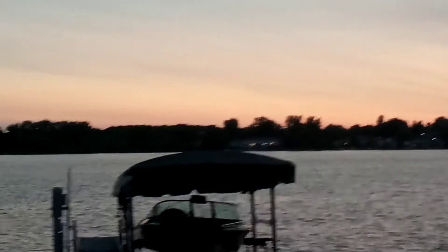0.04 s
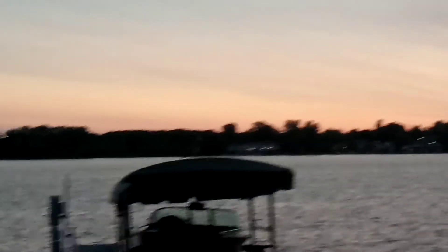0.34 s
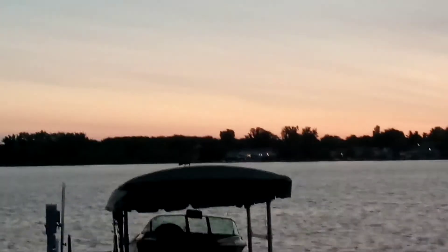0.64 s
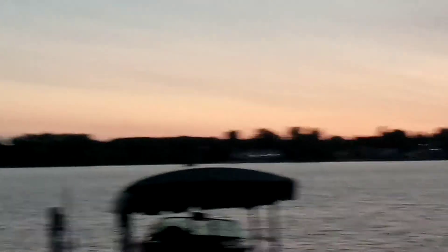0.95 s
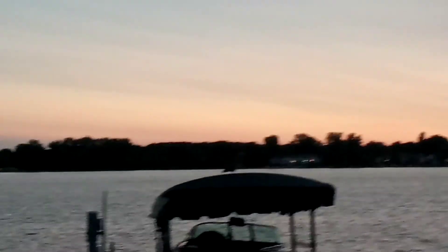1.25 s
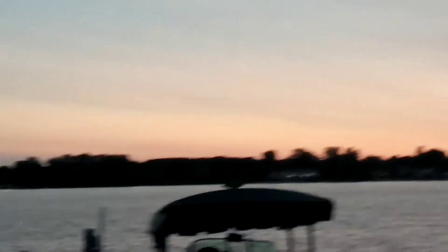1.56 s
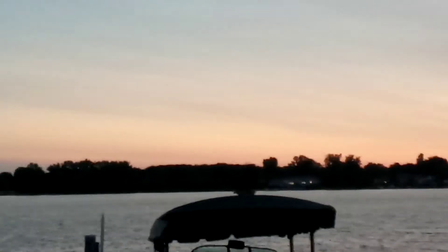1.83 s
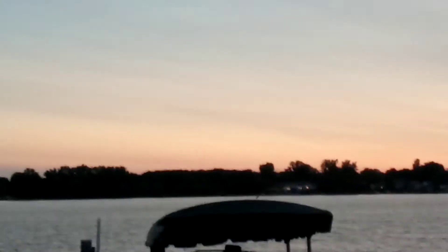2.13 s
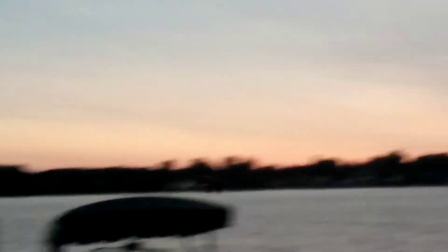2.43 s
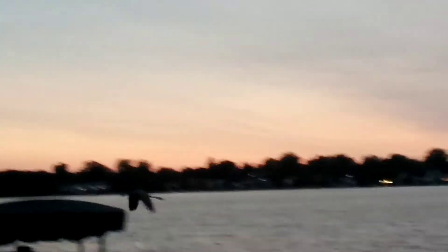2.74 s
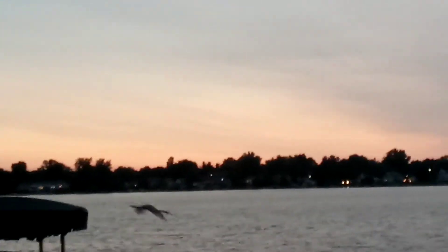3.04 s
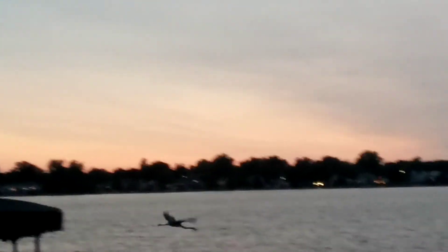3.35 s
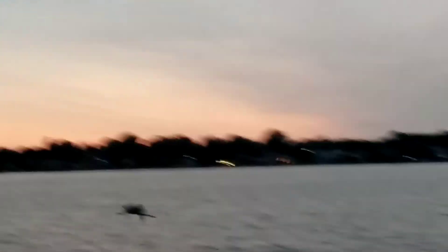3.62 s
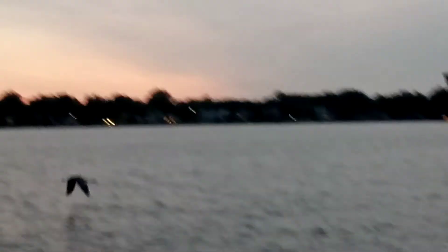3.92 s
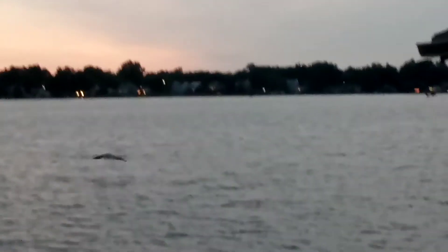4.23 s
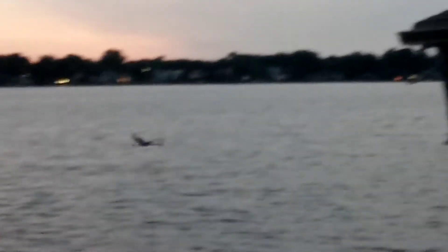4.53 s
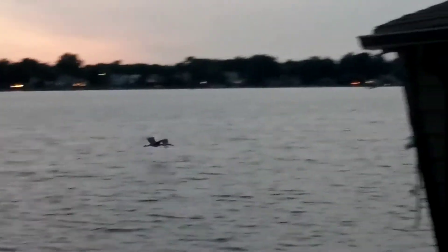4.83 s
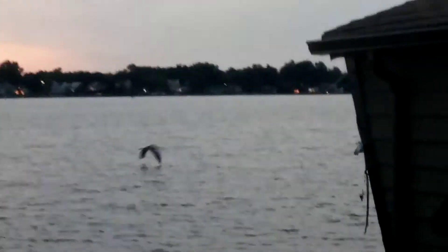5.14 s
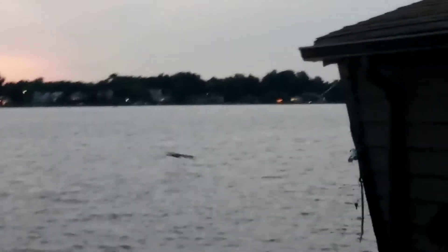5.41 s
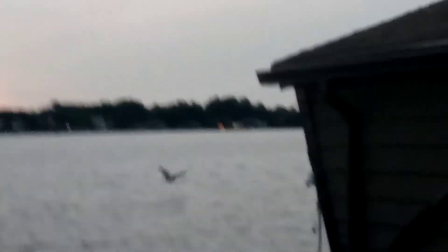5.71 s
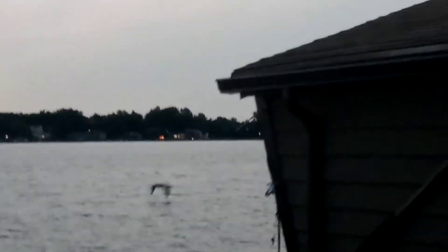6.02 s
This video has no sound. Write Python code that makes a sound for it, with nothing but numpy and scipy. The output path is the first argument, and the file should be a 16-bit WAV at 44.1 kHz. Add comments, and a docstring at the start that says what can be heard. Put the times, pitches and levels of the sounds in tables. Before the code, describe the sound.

Insects trill beside gently lapping water while wood snaps close by and a large bird squawks hoarsely three times, then croaks.

```python
"""A lake at dusk. A heron leaves a boat-lift canopy and flies out: three harsh squawks, then a low
rattling croak, all from slapping membranes that ring its throat. Three katydids and a tree cricket
sing with wing strokes over a distant insect chorus; another insect ticks. Close by, wood snaps,
with rustles, two soft bumps and faint chirps. Water laps and plops; far motors drone over a rumble."""
import sys
import numpy as np
from scipy import signal
from scipy.fft import rfft, irfft, next_fast_len
from scipy.io import wavfile
from scipy.ndimage import uniform_filter1d, map_coordinates

SR = 44100
rng = np.random.default_rng(int(sys.argv[2]) if len(sys.argv) > 2 else 0)


def transcribe(u):
    """Save the signal u as a 16-bit wav file named by the first command-line argument.

    u: samples, shape (n,) or (channels, n), limited to [-1, 1]; the rate is SR.
    q: integer samples, one column per channel.
    """
    v = np.clip(np.atleast_2d(u).T, -1, 1)
    q = np.round(v * 32767).astype(np.int16)
    wavfile.write(sys.argv[1], SR, q)


N = 272097

# squawks: (start [s], attack [s], hold [s], level at end of hold [dB], swell over hold [dB],
# fade-in [s], release [dB/s], slap rate [1/s], lower resonance [Hz], upper resonance [Hz],
# its sink [Hz/s], upper-band share before limiting [dB], nasal valley depth [0-1])
SQUAWKS = [ (2.25, 0.205, 0.19, -32.5, -2.5, 0.052, 153, 179, 640, 2740, 900, 2.5, 0.25),
           (2.799, 0.065, 0.18, -33, 5, 0.028, 197, 135, 1000, 2880, 2600, -2, 0.26),
           (3.244, .087, .11, -31.5, 3.5, 0.018, 176.5, 154, 985, 2810, 1200, -1.5, 0.8), ]
# break-up per squawk: (noise share at start of hold [0-1], at end of hold [0-1])
SQUAWK_NOISE = [(.72, .85), (.7, .8), (.42, .85)]
# throat response, one per squawk: (frequency [Hz], gain [dB])
FIRST_THROAT = [(450, -12.5), (680, -2), (880, -4.5), (1050, 2), (1400, 1), (1800, -6), (2100, -1.5),
                (2400, -2.5), (3050, -8.5), (3900, -16), (4500, -23.5), (5400, -30.5), (7000, -29.5),
                (9000, -49)]
SECOND_THROAT = [(450, -7), (700, -9.5), (1030, 1.5), (1500, -7), (1750, -3), (1950, -6.5), (2280, -0.5),
                 (2550, -5), (2820, -0.5), (3120, -17), (3450, -12), (4200, -23.5), (8000, -40)]
THIRD_THROAT = [(450, -11.5), (700, -14), (1030, -3), (1300, -1.5), (1600, -5), (1850, -7), (2200, -4),
                (2650, -0.5), (3020, -12), (3230, -9), (3700, -23), (4100, -23.5), (7000, -33.5),
                (9000, -45)]
ONSET_DB = -46.5  # call level at zero effort


def heron():
    """Three squawks and a croak, each with its own throat shape."""
    out = np.zeros(N)
    throats = [FIRST_THROAT, SECOND_THROAT, THIRD_THROAT]
    calls = [(start_s, squawk(call, throat, noise_shares))
             for (start_s, *call), throat, noise_shares in zip(SQUAWKS, throats, SQUAWK_NOISE)]
    for start_s, voice in calls + [(CROAK_CONTOUR[0][0], croak())]:
        out[round(start_s * SR):][:len(voice)] += voice
    return out


def squawk(call, throat, noise_shares, span_s=0.8, width_hz=190, valley_hz=1850, split_hz=1900):
    """One push of effort sets level, slap rate and roughness; the throat's upper resonance sinks."""
    (attack_s, hold_s, end_db, swell_db, fade_s, release_db_per_s,
     rate_hz, low_hz, high_hz, sink_hz_per_s, upper_db, valley_depth) = call
    t = clock()[:round(span_s * SR)]
    end_s, full_db = attack_s + hold_s, end_db - swell_db
    level_db = np.interp(t, [0, attack_s, end_s], [ONSET_DB, full_db, end_db])
    level_db -= release_db_per_s * np.maximum(t - end_s, 0)
    effort = np.clip((level_db - ONSET_DB) / (full_db - ONSET_DB), 0, 1)
    by_effort = lambda slack, full: slack + (full - slack) * effort
    over_hold = lambda first, last: np.interp(t, [attack_s, end_s], [first, last])
    noise_share = by_effort(0.87, over_hold(*noise_shares))
    source = syrinx(by_effort(0.86 * rate_hz, rate_hz), noise_share, flutter_share=0.5)
    # the nasal valley fills as the bill opens
    source -= over_hold(valley_depth, 0) * resonate(source, np.full(len(t), valley_hz), width_hz=270)
    low = resonate(source, np.full(len(t), low_hz), width_hz)
    high = resonate(source, high_hz - sink_hz_per_s * np.minimum(t, end_s + 0.023), width_hz)
    voice = coloured(source + by_effort(0.86, 0.59) * low + by_effort(0.86, 0.85) * high, throat)
    lower_band = signal.sosfiltfilt(signal.butter(4, split_hz, fs=SR, output="sos"), voice)
    upper_share = np.clip(amp(by_effort(-3, upper_db)) ** 2, 0.03, 0.85)
    voice = blend(unit(lower_band), unit(voice - lower_band), upper_share)
    return np.minimum(t / fade_s, 1) * amp(level_db) * steady(voice)


# croak contour: (time [s], level [dB], resonance [Hz])
CROAK_CONTOUR = [(4.245, -50.5, 950), (4.268, -41, 1030), (4.3, -36, 1470), (4.335, -34.5, 1270),
                 (4.372, -34, 1160), (4.392, -38, 980), (4.415, -46.5, 830)]
# rattle: (time [s], slap rate [1/s])
CROAK_RATTLE = [(4.245, 77), (4.265, 79), (4.3, 90), (4.325, 96), (4.37, 94), (4.39, 75), (4.415, 68)]
# throat response: (frequency [Hz], gain [dB])
CROAK_THROAT = [(450, -24), (700, -5), (860, -13.5), (1040, -4.5), (1340, -8), (1570, -3.5), (1850, -12.5),
                (2200, -7), (2700, -10.5), (3350, -31), (3880, -17), (4400, -21.5), (6500, -28.5)]


def croak(span_s=0.8, release_db_per_s=131, clean_db=-39, width_hz=600, ring_gain=1.8, echo_db=-16):
    """Slow slaps, cleanest when loud, ring a rising then falling resonance; distance adds echo."""
    t = CROAK_CONTOUR[0][0] + clock()[:round(span_s * SR)]
    level_db, ring_hz = curves(CROAK_CONTOUR, t)
    rate_hz, = curves(CROAK_RATTLE, t)
    level_db -= release_db_per_s * np.maximum(t - CROAK_CONTOUR[-1][0], 0)
    noise_share = np.interp(level_db, [ONSET_DB, clean_db], [0.6, 0.22])
    source = syrinx(rate_hz, noise_share, flutter_share=0.3)
    ringing = resonate(resonate(source, ring_hz, width_hz), ring_hz, width_hz)
    voice = amp(level_db) * steady(coloured(source + ring_gain * ringing, CROAK_THROAT))
    return voice + amp(echo_db) * shore(voice)[:len(t)]


def syrinx(rate_hz, noise_share, flutter_share, flutter_s=0.002, puff_s=0.008):
    """Membranes slap unevenly; each slap flutters briefly and lets through a puff of turbulence."""
    n = len(rate_hz)
    onsets = np.flatnonzero(np.diff(np.floor(np.cumsum(rate_hz) / SR)))
    late, strength = rng.standard_normal((n, 2))[:len(onsets)].T
    jitter_periods = 0.2 * late * noise_share[onsets] ** 1.415
    onsets = np.clip(onsets + jitter_periods * SR / rate_hz[onsets], 0, n - 1).astype(int)
    slaps = np.bincount(onsets, amp(0.5 * np.sqrt(noise_share[onsets]) * strength), n)

    def noise_tails(decay_s):
        envelope = signal.fftconvolve(slaps, np.exp(-clock()[:SR // 20] / decay_s))[:n]
        return steady(envelope * rng.standard_normal(n))

    voiced = blend(steady(slaps), noise_tails(flutter_s), flutter_share)
    return blend(voiced, noise_tails(puff_s), noise_share)


# dry snaps: (time [s], crack level [dB], body offset [dB], rebound gain [dB], ring centre [Hz])
WOOD_SNAPS = [(0.503, -20.5, 0, -13, 2870), (0.893, -26, -19, -19, 4600), (1.7257, -18, 1.5, -9, 2300),
              (1.7714, -31.5, 9, -17, 2000), (3.6229, -21, 4.5, -15, 2900), (4.931, -29.5, 10.5, -17, 2300),
              (4.9575, -17, 7, -8.5, 1440), (5.0045, -34, 11.5, -9, 1700), (5.798, -25.5, -4, -3, 1900)]
# wood modes: (frequency [Hz], gain [dB], t60 [s])
WOOD_MODES = [(1158, -2.5, 0.06), (1413, -2.5, 0.037), (1654, -2, 0.041), (1930, 0.5, 0.023),
              (2330, 2.5, 0.037), (2750, -5, 0.048), (3500, 3, 0.014), (4850, 9, 0.012)]
# crack spectrum: (frequency [Hz], gain [dB])
CRACK_SPECTRUM = [(1500, -6.5), (3300, -1), (5200, -7), (6700, -1.5), (8500, -10.5), (15000, -24)]


def snaps(rebound_s=0.0055, rebound_body_db=3, off_centre_db_per_oct=9, attack_s=0.0013, trim_db=-21.5):
    """Each snap and its rebound is a sharp crack that rings the wood's modes at new strengths."""
    rings, t = np.zeros(N + SR), clock()[:SR // 10]
    hz, mode_db, t60_s = np.transpose(WOOD_MODES)[:, :, None]
    contacts = []
    for s, db, body_db, rebound_db, centre_hz in WOOD_SNAPS:
        contacts.append((s, db, body_db, centre_hz))
        contacts.append((s + rebound_s, db + rebound_db, body_db + rebound_body_db, centre_hz))
    attack = 1 - np.exp(-t / attack_s)
    for s, db, body_db, centre_hz in contacts:
        strength, detune = rng.standard_normal((2, len(WOOD_MODES), 1))
        struck_db = mode_db - off_centre_db_per_oct * np.abs(np.log2(hz / centre_hz)) + 2 * strength
        modes = amp(struck_db - 60 * t / t60_s) * np.sin(2 * np.pi * hz * (1 + 0.025 * detune) * t)
        rings[round(s * SR):][:len(t)] += amp(db + body_db + trim_db) * modes.sum(axis=0) * attack
    cracks = bursts([(s, db) for s, db, *_ in contacts], t60_s=0.0074)
    return rings[:N] + coloured(cracks, CRACK_SPECTRUM)


# clearest rustles: (time [s], level [dB], half-width [s], centre [Hz])
NEAR_RUSTLES = [(0.12, -60, 0.19, 970), (0.57, -57.5, 0.11, 740), (0.574, -57, .006, 7150),
                (1.203, -54, 0.0033, 6400), (1.235, -60, .02, 6500), (1.345, -52, 0.038, 2870),
                (1.578, -45.5, 0.0021, 3600), (1.764, -39.5, 0.005, 2480), (1.932, -56, 0.021, 6700),
                (1.98, -57, 0.064, 700), (3.053, -49.5, 0.013, 7360), (3.666, -48.5, 0.015, 2410),
                (3.922, -57, 0.022, 7450), (4.199, -40.5, 0.0025, 3480), (4.22, -47, 0.008, 2800),
                (4.262, -47.5, 0.005, 7400), (4.265, -39, 0.0041, 2400), (4.94, -57, 0.05, 4900),
                (5.35, -55, 0.098, 636), (5.4, -51, 0.014, 3250), (5.604, -53, 0.0095, 7370),
                (6.098, -54.5, 0.013, 6770)]


def rustles(trail_delay_s=0.03, trail_db=-43, trail_hz=1220, crisp_per_s=13, crisp_db=-58.5, crisp_hz=7300):
    """Broad rustles, some alone and one trailing each snap; faint crisp ones come at random."""
    trails = [(s + trail_delay_s, db + body_db + trail_db, 0.038, trail_hz)
              for s, db, body_db, *_ in WOOD_SNAPS]
    crisp = [(when * N / SR, crisp_db + extra_db, 0.0051, crisp_hz * 2 ** (pitch - 0.5))
             for when, extra_db, pitch in rng.random((round(crisp_per_s * N / SR), 3))]
    return flurries(NEAR_RUSTLES + trails + crisp, q=2.1)


# soft bumps: (time [s], level [dB], pitch [Hz])
SOFT_BUMPS = [(2.304, -30, 130), (3.056, -31, 210)]


def bumps(half_width_s=0.0062):
    """Dull knocks, a few cycles long."""
    t = clock()
    return sum(amp(db) * np.exp(-((t - s) / half_width_s) ** 2) * np.sin(2 * np.pi * hz * (t - s))
               for s, db, hz in SOFT_BUMPS)


# song level of each singer: (time [s], level [dB])
NEAR_KATYDID_LEVEL = [(0, -51.5), (1, -53), (2.3, -56), (3.2, -63), (6.1, -65)]
FAR_KATYDID_LEVEL = [(2, -85), (3.2, -61.5), (6.1, -66)]
CRICKET_LEVEL = [(0, -63), (.7, -58), (2.2, -57), (2.9, -71), (3.9, -65.5), (4.6, -62), (6.1, -59.5)]


def singing_insects(quick_db=-11.5, echo_db=-10):
    """Three katydids and a cricket, blurred by trees, come and go as the listener follows the bird."""
    gain = lambda levels: amp(curves(levels, clock())[0])
    near = katydid(rate_hz=59, start_hz=5088, end_hz=4282, overtone_db=-33, scatter_db=0.9)
    far = katydid(rate_hz=59, start_hz=5470, end_hz=4610, overtone_db=-11, scatter_db=3.5)
    quick = katydid(rate_hz=66.8, start_hz=4930, end_hz=4385, overtone_db=-24, scatter_db=1)
    song = gain(NEAR_KATYDID_LEVEL) * (near + amp(quick_db) * quick)
    song += gain(FAR_KATYDID_LEVEL) * far + gain(CRICKET_LEVEL) * tree_cricket()
    return song + amp(echo_db) * shore(song)


def katydid(rate_hz, start_hz, end_hz, overtone_db, scatter_db, duty=0.68, rasp_rad=0.27):
    """Each wing stroke slows along the file, so its tone falls; a weak stroke follows every 6 to 11."""
    strokes = np.cumsum(rate_hz * (1 + 0.01 * wobble(4.4))) / SR
    index = strokes.astype(int)
    strength = amp(scatter_db * rng.standard_normal(index[-1] + 1))
    weak = np.cumsum(rng.integers(7, 13, len(strength)))
    strength[weak[weak < len(strength)]] = 0.54
    travel = np.clip(strokes % 1 / duty, 0, 1)
    hz = start_hz + (end_hz - start_hz) * travel + 60 * wobble(60)
    phase = phase_of(hz) + rasp_rad * wobble(1200)
    tone = np.sin(phase) + amp(overtone_db) * np.sin(2 * phase)
    return unit(strength[index] * np.sin(np.pi * travel) * tone)


def tree_cricket(rate_hz=48.5, pitch_hz=2345, droop_hz=170):
    """A trill of soft, nearly pure pulses, each sagging in pitch."""
    stroke = np.cumsum(rate_hz * (1 + 0.031 * wobble(8.5))) / SR % 1
    phase = phase_of(pitch_hz + droop_hz * (0.5 - stroke) + 75 * wobble(200))
    return unit(np.sin(np.pi * stroke) * amp(1.3 * wobble(20)) * np.sin(phase))


# tick runs: (start [s], count, first gap [s], first level [dB])
INSECT_TICKS = [(2.008, 2, 0.279, -41), (2.8187, 2, 0.32, -48), (3.281, 3, .229, -39),
                (4.488, 10, 0.19, -40)]


def ticking_insect(hurry_s=0.0037, growth_db=0.26):
    """Runs of thin high ticks, each sooner and louder than the last."""
    ticks = [(s + k * gap_s - hurry_s * k * (k - 1) / 2, db + k * growth_db)
             for s, count, gap_s, db in INSECT_TICKS for k in range(count)]
    return coloured(bursts(ticks, t60_s=0.012), [(7000, -12), (8600, 3), (11000, 2), (12500, -17)])


# chirps: (time [s], level [dB])
FAINT_CHIRPS = [(1.085, -46.5), (1.235, -56), (1.309, -47.5), (1.62, -53), (2.01, -52.5)]


def chirps(half_width_s=0.0097, pitch_hz=3200):
    """Faint chirps of narrow-band noise, all on one pitch."""
    return flurries([(s, db, half_width_s, pitch_hz) for s, db in FAINT_CHIRPS], q=7.3)


# clearest plops: (time [s], level [dB], pitch [Hz])
WATER_PLOPS = [(1.742, -53, 900), (1.775, -56, 1090), (3.91, -59.5, 1165), (4.601, -48.5, 1090),
               (4.905, -53, 850), (5.402, -53, 1370), (5.413, -48.5, 612), (5.817, -52, 1840)]


def plops(half_width_s=0.022, faint_per_s=20, faint_db=-8.5, faint_hz=560):
    """Small waves plop ashore; faint ones follow the lapping level, within an octave of their pitch."""
    level_db = lapping_db() + faint_db
    faint = [(when * N / SR, level_db[int(when * N)], faint_hz * 2 ** (2 * pitch - 1))
             for when, pitch in rng.random((round(faint_per_s * N / SR), 2))]
    return flurries([(s, db, half_width_s, hz) for s, db, hz in WATER_PLOPS + faint], q=10.7)


# small waves: (frequency [Hz], gain [dB])
LAPPING_SPECTRUM = [(220, -3), (350, -1), (550, -1), (800, -9), (1100, -15), (1800, -19.5)]


def lapping():
    """Water laps along the shore in shifting patches."""
    return amp(lapping_db()) * rush(LAPPING_SPECTRUM, patchy_db=5)


def lapping_db():
    """One slow swell of the waves."""
    return swell(floor_db=-60, peak_s=3.5, peak_db=-53.5, rise_db_per_s=1.1, fall_db_per_s=2.5)


# far motors: (first pitch [Hz], settled pitch [Hz], settling time [s], floor [dB], peak time [s],
# peak level [dB], rise [dB/s], fall [dB/s])
FAR_MOTORS = [(129.5, 141.5, 3.0, -66, 1.65, -50.5, 5.5, 6), (180, 174.4, 2.8, -62, 4.97, -49.5, 6, 59)]


def motors(hum_hz=254.2, hum_db=-63):
    """Far motors settle to a steady speed and swell once, over a faint hum."""
    out = drone(hum_hz, hum_db)
    for first_hz, settled_hz, settle_s, *swell_shape in FAR_MOTORS:
        out += drone(np.interp(clock(), [0, settle_s], [first_hz, settled_hz]), swell(*swell_shape))
    return out


def drone(hz, db):
    """A far tone that wavers on its way over the water."""
    return amp(db + 2.4 * wobble(14)) * np.sqrt(2) * np.sin(phase_of(hz + 1.8 * wobble(14)))


# distant insects: (frequency [Hz], gain [dB])
CHORUS_SPECTRUM = [(1200, -16), (1950, -9.5), (2350, 2.5), (2900, -1.5), (3500, -2), (4100, 1.5),
                   (4900, -3.5), (5500, -11.5), (6600, -7), (8500, -10), (10000, -9), (11500, -19),
                   (15800, -18.5)]


def insect_chorus(level_db=-55):
    """Many far insects blur into a hiss."""
    return amp(level_db) * rush(CHORUS_SPECTRUM, patchy_db=0.6)


# distant rumble: (frequency [Hz], gain [dB])
RUMBLE_SPECTRUM = [(25, -33), (40, -21), (62, -7), (82, 1.5), (125, -0.5), (200, -4), (260, -8.5),
                   (310, -11), (520, -18), (800, -40), (1250, -32.5), (2000, -46)]


def rumble():
    """Low distant noise that swells once."""
    level_db = swell(floor_db=-51.5, peak_s=1.5, peak_db=-48.5, rise_db_per_s=11, fall_db_per_s=0.3)
    return amp(level_db) * rush(RUMBLE_SPECTRUM, patchy_db=1)


def walls(x, count=6, gain_db=-18.5, delay_range_s=(0.004, 0.03)):
    """Early reflections from the boat lift and the boathouse."""
    delays_s = rng.uniform(*delay_range_s, count)
    return amp(gain_db) * sum(np.pad(x, (round(s * SR), 0))[:N] for s in delays_s)


# shore echo: (frequency [Hz], t60 [s])
SHORE_DECAY = [(300, 0.14), (2000, 0.36), (9000, 0.056)]


def shore(x, delay_samples=300):
    """Trees and sheds along the shore scatter a short tail."""
    hz, t, noise = signal.stft(rng.standard_normal(SR // 2), SR, nperseg=256)
    tail = signal.istft(noise * amp(-60 * t / along(SHORE_DECAY, hz)[:, None]), SR, nperseg=256)[1]
    return signal.fftconvolve(x, np.pad(tail, (delay_samples, 0)) / np.linalg.norm(tail))[:N]


def bursts(rows, t60_s):
    """A dying noise burst per (time [s], level [dB]) row."""
    out, t = np.zeros(N + SR), clock()[:SR // 10]
    for s, db in rows:
        out[round(s * SR):][:len(t)] += amp(db - 60 * t / t60_s) * rng.standard_normal(len(t))
    return out[:N]


def flurries(rows, q, grain_db=3):
    """A grainy swell of resonant noise per (time [s], level [dB], half-width [s], centre [Hz]) row."""
    out, t = np.zeros(N), clock()
    grains = rng.standard_normal(N) * amp(grain_db * wobble(400))
    for s, db, half_width_s, hz in rows:
        span = slice(max(round((s - 3 * half_width_s) * SR), 0), round((s + 3 * half_width_s) * SR))
        band = signal.lfilter(*signal.iirpeak(hz, q, SR), grains[span])
        band = signal.lfilter(*signal.iirpeak(hz, q / 2, SR), band)
        out[span] += amp(db) * unit(band) * np.exp(-((t[span] - s) / half_width_s) ** 2)
    return out


def rush(spectrum, patchy_db):
    """Coloured noise, rms 1, with patches of random gain in time and frequency."""
    bins = signal.stft(rng.standard_normal(N), nperseg=1024)[2]
    patches = uniform_filter1d(rng.standard_normal(bins.shape), size=3, axis=0)
    patches = unit(uniform_filter1d(patches, size=9, axis=1))
    noise = signal.istft(bins * amp(patchy_db * patches), nperseg=1024)[1][:N]
    return unit(coloured(noise, spectrum))


def coloured(x, spectrum):
    """Minimum-phase filter through (frequency [Hz], gain [dB]) points, falling off past both ends."""
    size = 2 * next_fast_len(len(x) // 2 + 8192)
    hz = np.fft.rfftfreq(size, 1 / SR)
    closed = [(spectrum[0][0] / 4, -70), *spectrum, (spectrum[-1][0] * 2, -70)]
    cepstrum = irfft(np.log(amp(along(closed, hz))), size)
    cepstrum[1:size // 2] *= 2
    cepstrum[size // 2 + 1:] = 0
    return irfft(rfft(x, size) * np.exp(rfft(cepstrum)), size)[:len(x)]


def resonate(x, hz, width_hz):
    """Moving resonance: shift its centre to zero, smooth, shift back."""
    carrier = np.exp(1j * phase_of(hz))
    pole = np.exp(-np.pi * width_hz / SR)
    return 2 * np.real(signal.lfilter([1 - pole], [1, -pole], x / carrier) * carrier)


def steady(x):
    """Even out the slow level, keep the pulses."""
    window = np.hanning(SR // 20)
    power = np.abs(signal.fftconvolve(x ** 2, window / window.sum(), "same"))
    return x / np.sqrt(power + 1e-12)


def swell(floor_db, peak_s, peak_db, rise_db_per_s, fall_db_per_s):
    """Level [dB] that climbs from a floor to one peak and sinks."""
    t = clock() - peak_s
    return np.maximum(floor_db, peak_db + np.minimum(rise_db_per_s * t, -fall_db_per_s * t))


def wobble(knots_per_s):
    """Smooth random curve."""
    return map_coordinates(rng.standard_normal(int(N * knots_per_s / SR) + 4), [clock() * knots_per_s])


def curves(rows, t):
    """Each column after the time, interpolated at t."""
    s, *columns = np.transpose(rows)
    return [np.interp(t, s, column) for column in columns]


def along(points, hz):
    """Interpolate (frequency [Hz], value) points on a log axis."""
    knots_hz, values = np.transpose(points)
    return np.interp(np.log(hz + 1), np.log(knots_hz + 1), values)


def blend(a, b, b_share):
    """Equal-power mix."""
    return np.sqrt(1 - b_share) * a + np.sqrt(b_share) * b


def phase_of(hz):
    """Running phase [rad]."""
    return 2 * np.pi * np.cumsum(hz) / SR


def amp(db):
    """Decibels to gain."""
    return 10 ** (np.asarray(db) / 20)


def unit(x):
    """Scale to rms 1."""
    return x / np.sqrt(np.mean(x ** 2) + 1e-20)


def clock():
    """Sample times [s]."""
    return np.arange(N) / SR


def scene(bird_echo_db=-16.5, near_echo_db=-12):
    """The bird, the small sounds nearby and the evening around them, in mono."""
    bird = heron()
    near = snaps() + rustles() + bumps()
    echo = shore(amp(bird_echo_db) * bird + amp(near_echo_db) * near)
    foreground = bird + walls(bird) + near + echo
    midground = singing_insects() + ticking_insect() + chirps() + plops()
    background = motors() + lapping() + insect_chorus() + rumble()
    return (foreground + midground + background)[None]


def record(dry, top_hz=15850):
    """Brick-wall low-pass."""
    size = next_fast_len(N + 8192)
    passband = np.fft.rfftfreq(size, 1 / SR) < top_hz
    return irfft(rfft(dry, size) * passband, size)[:, :N]


dry = scene()
out = record(dry)
transcribe(out)
```